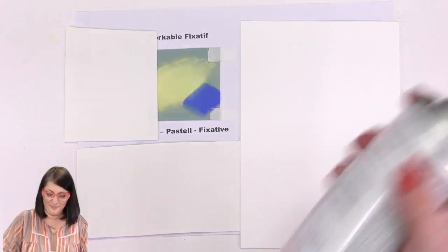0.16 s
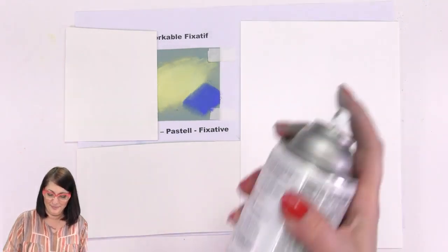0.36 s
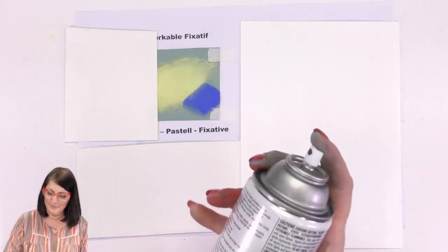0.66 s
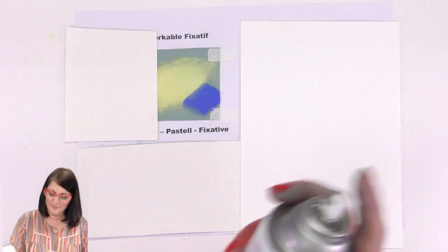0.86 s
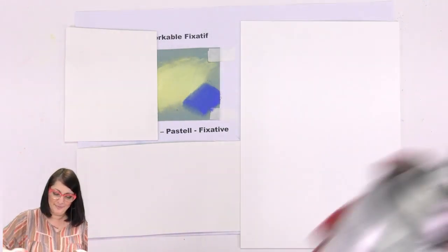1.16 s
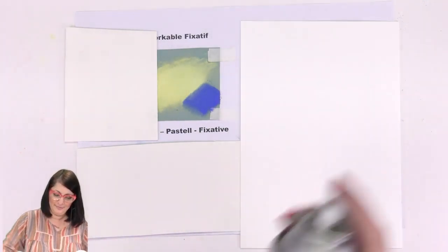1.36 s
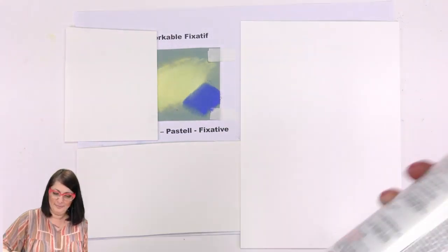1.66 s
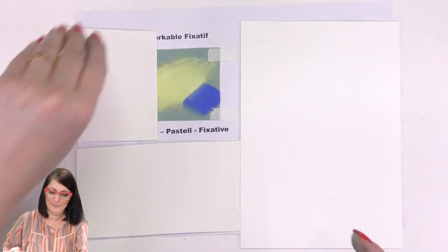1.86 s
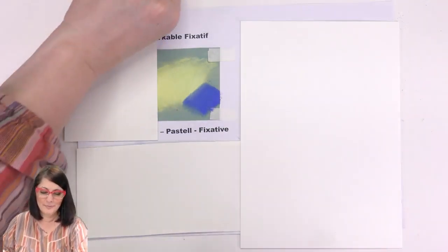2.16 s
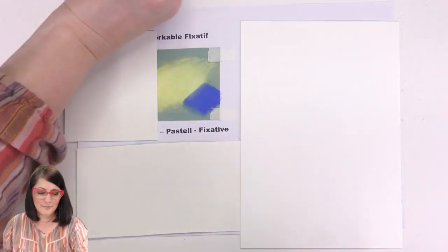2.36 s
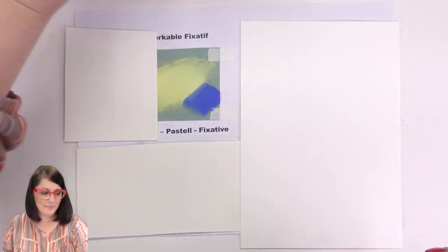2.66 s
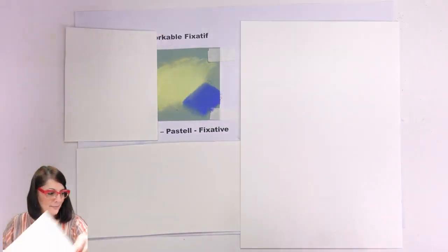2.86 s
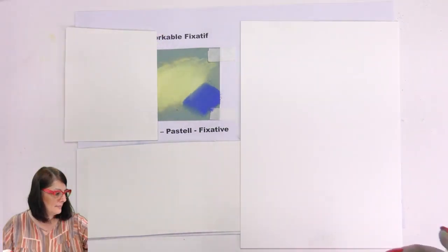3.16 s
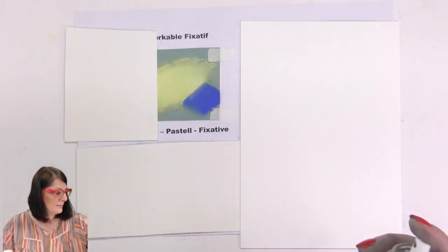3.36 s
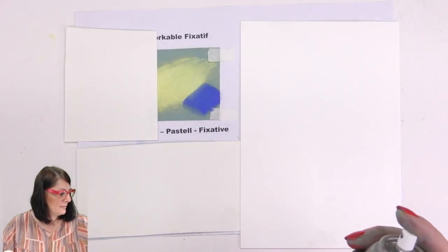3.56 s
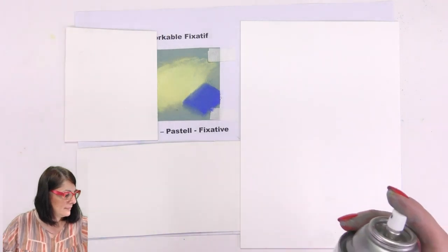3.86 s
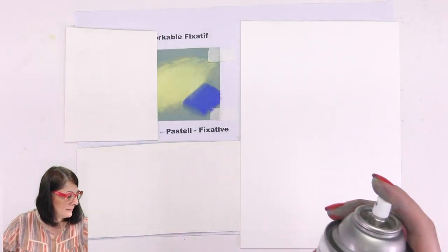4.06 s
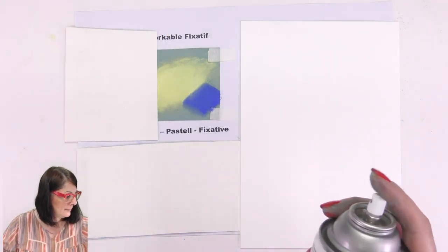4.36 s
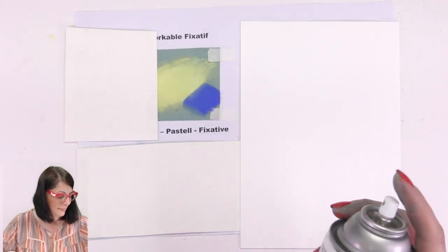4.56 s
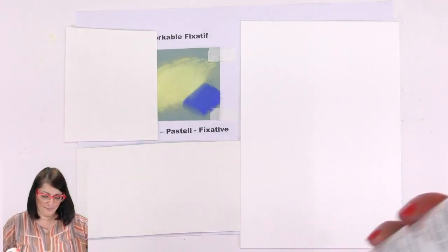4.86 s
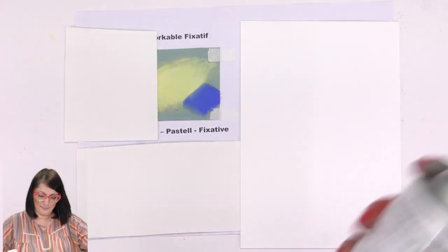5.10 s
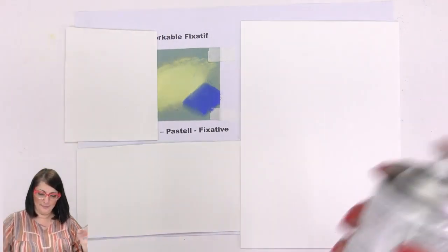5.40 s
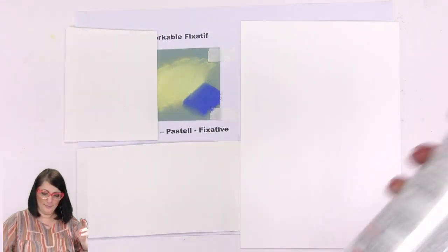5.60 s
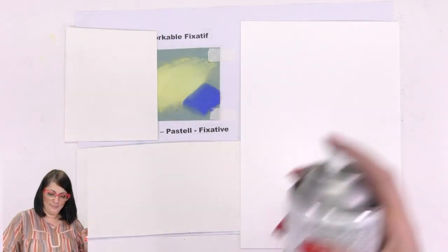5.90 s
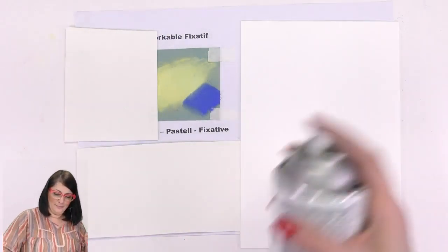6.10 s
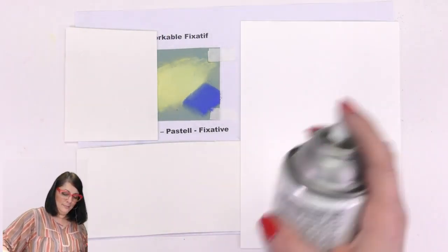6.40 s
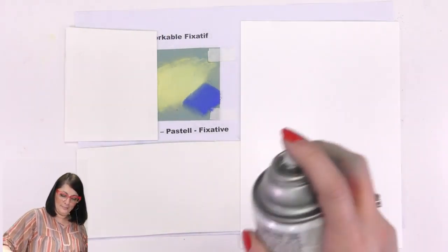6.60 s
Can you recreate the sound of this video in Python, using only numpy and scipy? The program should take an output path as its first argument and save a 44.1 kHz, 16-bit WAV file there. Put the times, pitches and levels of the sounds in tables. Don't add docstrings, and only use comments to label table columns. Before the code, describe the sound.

A half-full spray can is shaken hard in two bursts, its metal ball clacking and rattling, with ticking and soft rustles between.

```python
import sys
import numpy as np
from scipy import signal
from scipy.io import wavfile
from scipy.ndimage import uniform_filter1d

SR = 44100
rng = np.random.default_rng(int(sys.argv[2]) if len(sys.argv) > 2 else 0)


def boost(x):
    u = np.asarray(x, float) / 20
    return 10 ** u


def transcribe(u):
    v = np.clip(np.atleast_2d(u).T, -1, 1)
    q = np.round(v * 32767).astype(np.int16)
    wavfile.write(sys.argv[1], SR, q)


N = 297234

# pitch_hz, level_db (per Hz)
ROOM_TONE = [(20, -11), (45, -9.5), (150, -13), (270, -5), (432, -19), (1200, -29), (8000, -51),
             (16500, -55.5)]
# pitch_hz, level_db
DRONE_TONES = [(49, -68), (92, -72.5), (198, -75.5), (261, -71.5)]
# peak_s, rise_s, fall_s, level_db
ARM_SWINGS = [
    (.15, 0.21, 0.17, -51.5),
    (.93, 0.12, 0.24, -52.5),
    (1.17, 0.16, 0.055, -43.5),
    (1.42, 0.24, 0.45, -51.5),
    (4.9, 0.23, 0.98, -62),
    (5.55, 0.26, 0.47, -52.5),
    (6.1, 0.65, 0.96, -67),
]
# pitch_hz, level_db (per Hz)
LIQUID_COLOUR = [(590, -38), (1000, -8), (1540, -0.5), (2150, -0.5), (3460, -1), (7880, -7), (16000, -13.5)]
# time_s, level_db
LIQUID_EFFORT = [(0, -34.5), (.095, -44.5), (.21, -75.5), (.45, -54), (.68, -73.5), (.95, -69),
                 (1.25, -45.5), (1.5, -40), (1.7, -69.5), (1.9, -63.5), (2.04, -71), (2.9, -76.5),
                 (4.9, -82), (5.08, -62), (5.3, -48), (6.2, -54), (6.6, -85), (6.74, -66)]
# peak_s, rise_s, fall_s, rustle_db, rub_db
HAND_BRUSHES = [(.77, 0.049, 0.025, -67.5, -93), (2.17, 0.18, 0.17, -59.5, -78),
                (2.43, 0.19, 0.46, -52, -63), (2.68, 0.081, 0.022, -64.5, -79),
                (2.78, 0.098, 0.049, -74.5, -69.5), (3.1, 0.13, 0.033, -71, -80.5),
                (3.13, .008, 0.055, -84.5, -61), (3.8, 0.062, 0.082, -66, -61),
                (4.207, 0.011, 0.069, -58.5, -64), (4.3, 0.075, 0.077, -63.5, -59.5),
                (4.48, .11, 0.17, -58.5, -66), (4.632, .006, 0.074, -66.5, -51.5),
                (4.82, 0.035, 0.1, -66, -81.5)]
# peak_s, rise_s, fall_s, level_db
DOME_ROLLS = [
    (.55, 0.065, 0.28, -65.5),
    (2.4, .07, 0.22, -56.5),
    (2.72, 0.15, 0.08, -65),
    (3.02, .08, 0.08, -66),
]
# peak_s, rise_s, fall_s, level_db, pitch_hz
WALL_TRUNDLES = [
    (.3, 0.052, 0.2, -48.5, 1790),
    (.93, 0.07, 0.065, -58, 1600),
    (1.95, 0.14, 0.093, -50, 1526),
    (2.23, 0.12, .07, -57.5, 1500),
    (2.43, 0.1, 0.15, -53, 1496),
    (4.95, 0.031, 0.084, -54.5, 1576),
]
# pitch_factor, level_db, t60_s
DOME_MODES = [(1.0023, 3.5, 0.0066), (0.872, -9, 0.015), (0.66, -11, 0.0083), (1.14, -7.5, 0.009)]
# pitch_factor, level_db, t60_s
WALL_MODES = [(1.0, -4, 0.012), (.8, -7, 0.011), (0.69, -7, 0.0074), (1.5, -5.5, 0.011), (1, -19.5, .06)]
# pitch_factor, level_db, t60_s
BODY_MODES = [(1.4, -0.5, 0.027), (0.57, -9.5, 0.02), (1.45, -14, 0.015)]
# start_s, dome_db, wall_db, crack_db, dome_hz
BLOWS = [(0.9914, -9, -31.5, -20, 3900), (1.0179, -12, -21.5, -15.5, 3915),
         (1.075, -5.5, -20, -12, 4000), (1.1539, -4, -28, -10, 3000), (1.164, -0.5, -21, -20, 3896),
         (1.1733, -10, -25.5, -13.5, 3895), (1.2186, -15, -27, -22, 3353),
         (1.3023, -4.5, -16, -13, 3512), (1.3958, -1.5, -27, -10.5, 3418),
         (1.8257, -8.5, -25, -24.5, 3930), (2.3294, -16.5, -29, -29, 3600),
         (4.9928, -10, -17, -12.5, 4030), (5.1051, -4, -36, -11, 3320), (5.2042, -4, -14.5, -10, 3894),
              (5.3067, -1.5, -48, -13, 3487), (5.4349, -6.5, -12, -13.5, 3590),
              (5.5129, -24.5, -24, -26.5, 4840), (5.5505, -4.5, -9, -12, 3515),
              (5.5566, -1.5, -18, -17, 3617), (5.576, -27, -33, -12.5, 2900),
              (5.6571, -3.5, -16, -11.5, 3810), (5.7424, -3, -48, -9, 3310),
              (5.873, -4.5, -15, -13.5, 3850), (5.9738, -1.5, -19.5, -12, 3886),
              (6.091, -5, -30, -8.5, 3860), (6.1824, -1, -36, -10.5, 3765), (6.253, -23, -17.5, -35, 2500),
              (6.3085, -8, -23, -13, 3760), (6.4216, -15, -17, -18, 2680),
              (6.5085, -20, -20.5, -29.5, 4220), (6.6987, -16.5, -24, -15.5, 3680)]
# start_s, clack_db, clack_hz, crack_hz, wall_hz
BLOW_LANDINGS = [(0.9914, -9.5, 5500, 7250, 2150), (1.0179, -14, 4790, 12130, 2560),
                 (1.075, -19, 4440, 7010, 2500), (1.1539, -10, 4950, 7010, 2570),
                 (1.164, -9.5, 4950, 11330, 2640), (1.1733, -21.5, 4778, 13040, 2590),
                 (1.2186, -32, 6560, 8300, 2370), (1.3023, -16.5, 4400, 9920, 1390),
                 (1.3958, -5.5, 5150, 7010, 1710), (1.8257, -27.5, 5570, 7860, 2030),
                 (2.3294, -27.5, 4680, 9370, 2550), (4.9928, -21, 4620, 9700, 1580),
                 (5.1051, -10, 4550, 8780, 2560), (5.2042, -21, 5330, 8060, 2420),
                 (5.3067, -5, 4780, 12120, 2580), (5.4349, -17.5, 4610, 9560, 1760),
                 (5.5129, -31, 5100, 13000, 1250), (5.5505, -13, 6470, 9430, 2600),
                 (5.5566, -21, 4300, 11410, 2540), (5.576, -21.5, 4600, 6930, 2280),
                 (5.6571, -11.5, 5640, 9370, 2380), (5.7424, -7, 4570, 9270, 2210),
                 (5.873, -16, 5670, 7840, 2040), (5.9738, -7, 4705, 12960, 2070),
                 (6.091, -13.5, 4780, 9160, 1920), (6.1824, -9.5, 4810, 8330, 2340),
                 (6.253, -31.5, 4710, 7960, 2170), (6.3085, -20.5, 5840, 9280, 1790),
                 (6.4216, -26, 4520, 11000, 1820), (6.5085, -28.5, 4420, 7900, 1514),
                 (6.6987, -23.5, 5440, 7700, 2430)]
# start_s, dome_db, wall_db,
# wall_hz
TAPS = [(.0975, -36, -32, 1130), (0.2344, -35, -21.5, 1850), (0.2822, -33.5, -25.5, 1870),
        (.311, -47, -30.5, 1610), (0.3738, -31.5, -33, 1810), (0.8685, -48, -52.5, 1500),
        (0.9217, -35.5, -30.5, 1760), (.9735, -34.5, -34, 1400), (1.028, -20.5, -19.5, 2260),
        (1.1164, -33, -19, 1470), (1.1926, -27.5, -41.5, 2090), (1.2401, -22, -15.5, 1845),
        (1.2635, -39, -35.5, 1710), (1.289, -32, -24.5, 1580), (1.3482, -29, -18.5, 1620),
        (1.374, -45.5, -31.5, 1260), (1.417, -19, -22, 1390), (1.4472, -15, -16, 1780),
        (1.4648, -26, -16, 1840), (1.478, -39, -19.5, 1720), (1.5637, -37.5, -38, 1610),
        (1.5719, -42, -30.5, 1400), (1.7083, -50, -46, 1067), (1.7304, -26.5, -20, 1784),
        (1.859, -25, -28.5, 1560), (1.9071, -39, -28, 1560), (2.2501, -59.5, -50, 1490),
        (2.7731, -48.5, -47.5, 2300), (2.7886, -45, -49, 1410), (3.1243, -70.5, -45.5, 1170),
        (4.9168, -29.5, -31, 1580), (5.1571, -20, -19.5, 1770), (5.183, -25, -26, 2050),
             (5.258, -27, -20, 1750), (5.302, -31, -33, 1330), (5.362, -18, -22, 2230),
             (5.39, -33, -19, 1840), (5.4235, -21, -23, 1610), (5.5887, -15, -15, 1640),
             (5.6103, -20, -19, 1400), (5.8023, -20.5, -22.5, 1780), (5.8423, -21.5, -20.5, 1890),
             (5.918, -39, -19.5, 1750), (5.9701, -20, -20.5, 1186), (6.0305, -21, -16.5, 1810),
             (6.1476, -21, -20, 1810), (6.197, -15, -25, 2260), (6.208, -17, -16, 1930),
             (6.2769, -32, -19, 1790), (6.2983, -25, -23.5, 2220), (6.458, -50, -35, 1750),
             (6.6376, -28.5, -21, 2033), (6.7237, -28, -28, 1670)]
# start_s, clack_db, clack_hz, crack_hz, dome_hz
TAP_LANDINGS = [(0.0975, -47, 6560, 8240, 2800), (0.2349, -36, 5060, 6800, 4390),
                (0.2823, -44, 4580, 7040, 3590), (0.311, -46, 4670, 8800, 3390),
                (0.3743, -36.5, 4520, 10300, 3500), (0.8692, -68, 4510, 9540, 3820),
                (0.9221, -48, 4450, 10700, 3950), (0.9735, -52, 4400, 9600, 3320),
                (1.0283, -30, 4460, 7010, 2700), (1.1161, -36, 4510, 8820, 3880),
                (1.1935, -30.5, 5580, 11350, 3260), (1.2403, -27.5, 5160, 11300, 2760),
                (1.2635, -40.5, 6630, 8820, 2900), (1.2893, -44.5, 5530, 7600, 3600),
                (1.3483, -40, 6640, 9000, 2700), (1.3743, -37.5, 4400, 10870, 3880),
                (1.4174, -23, 4740, 7890, 2970), (1.4474, -33.5, 6920, 7010, 3000),
                (1.4648, -24, 4440, 9400, 2770), (1.478, -46, 5460, 7500, 3550),
                (1.5631, -50, 4790, 7280, 2820), (1.5724, -42, 5540, 11090, 3190),
                (1.7083, -65, 5010, 7410, 3630), (1.7305, -35, 5440, 7330, 4080),
                (1.859, -33, 4400, 8550, 3930), (1.9071, -40, 4400, 8770, 4390),
                (2.2501, -60, 5030, 7360, 3940), (2.7731, -58, 4860, 7910, 3770),
                (2.7886, -62, 4570, 12530, 3710), (3.1243, -75, 4570, 10550, 3930),
                (4.9168, -44, 4400, 8200, 3710), (5.1575, -28, 5390, 7040, 3490),
                     (5.1835, -30, 5060, 7060, 3200), (5.258, -31, 4700, 7870, 2700),
                     (5.302, -21.5, 4500, 8150, 3170), (5.3618, -22.5, 4300, 9960, 3000),
                     (5.3898, -35, 6100, 7010, 2700), (5.4235, -33, 4480, 8420, 4360),
                     (5.5884, -34, 5520, 9040, 2800), (5.6103, -40, 4530, 7080, 3730),
                     (5.8021, -36, 4870, 7010, 3770), (5.8425, -29, 4610, 9430, 2700),
                     (5.918, -35, 4360, 8270, 3880), (5.9701, -17.5, 5200, 12730, 3700),
                     (6.0306, -22, 4940, 7010, 4000), (6.1478, -32, 5140, 9330, 2700),
                     (6.197, -38, 4380, 7190, 3770), (6.208, -28, 4400, 7530, 3960),
                     (6.2771, -30, 4960, 7240, 3010), (6.2985, -40, 4500, 7640, 3830),
                     (6.458, -52, 4530, 7390, 3410), (6.6378, -31.5, 6160, 7600, 4390),
                     (6.7237, -47, 6370, 7420, 3840)]
# first_s, last_s, gap_s, dome_db, wall_db
CHATTER_RUNS = [
    (.3344, .3579, .023, -43, -32),
    (.4173, 0.468, 0.016, -28.5, -37),
    (0.54, .6283, 0.027, -59, -48.5),
    (1.938, 1.976, .02, -40.5, -34),
    (2.378, 2.436, 0.021, -40, -33.5),
    (2.461, 2.5374, 0.0276, -28.5, -44),
    (4.941, 4.977, 0.013, -32.5, -36.5),
]
# start_s, level_db, pitch_hz
DOME_TICKS = [(2.3935, -26.5, 3670), (2.4169, -34, 3680), (2.4443, -33.5, 3410), (2.6948, -49, 3680),
              (2.7207, -54, 3660), (2.9764, -56.5, 4070), (2.9964, -61, 3980), (3.0174, -55, 3840),
              (3.042, -50, 3840), (3.0724, -60.5, 4100), (3.3313, -49, 4030), (3.3754, -59.5, 4290),
              (3.5744, -64, 4280), (3.6134, -57.5, 4170), (3.6314, -64, 4300), (3.6574, -67, 4220)]
# start_s, body_db, body_hz, thump_db, tail_db
GRIP_KNOCKS = [(0.0975, -41, 1120, -64, 6.5), (0.2349, -51, 1120, -58, -3.5),
               (0.9914, -41, 1120, -50, -1.5), (1.0179, -40, 1050, -47, -2.5), (1.075, -29.5, 447, -47, 1),
               (1.1539, -29, 1090, -37, -2), (1.164, -30, 397, -36, -1), (1.1733, -31, 990, -40, -3),
               (1.2186, -44.5, 955, -59, -1), (1.3023, -26, 444, -36, 1.5), (1.3958, -31.5, 464, -38, -0.5),
               (1.7305, -48.5, 1040, -55, 1.5), (1.8257, -37.5, 450, -55, -3.5),
               (2.3294, -48, 700, -59, -2), (4.9928, -35, 950, -62.5, -1), (5.1051, -39, 1070, -48, 0),
               (5.2042, -28, 660, -62, 0), (5.3067, -30, 1110, -45, -2), (5.4349, -33, 1070, -55, 0.5),
               (5.5129, -36.5, 900, -58, 0), (5.5505, -33, 1000, -38, 1), (5.5566, -46, 930, -39, -1.5),
               (5.576, -37, 1080, -48, -1.5), (5.6571, -29.5, 440, -56, 0.5),
               (5.7424, -29.5, 449, -40, 0.5), (5.873, -29, 430, -36, 3.5), (5.9738, -26, 425, -27, -3.5),
               (6.091, -27, 1080, -52, -0.5), (6.1824, -30, 410, -38, 0.5), (6.253, -25.5, 1100, -48, 3.5),
               (6.3085, -32, 700, -58, 1), (6.4216, -34, 1050, -50, -4.5), (6.5085, -54, 1000, -57, -3.5),
               (6.6378, -41.5, 820, -59, -3), (6.6987, -53, 1060, -67, -2)]
# delay_s, level_db
NEAR_ECHOES = [
    (.0022, -22),
    (.0095, -19),
]
# pitch_hz, level_db, t60_s
ROOM_TAIL = [(307, -12.5, 0.13), (980, 4.5, 0.2), (2910, 3.5, 0.29), (5340, 0, 0.27), (9450, -1, .23),
             (15200, -7.5, 0.28)]

GENTLE_DULL = 0.65
FIRM_DB = -39.5


def evened(x):
    return x / np.sqrt(np.mean(x ** 2) + 1e-20)


def read(points, hz, column=1):
    table = np.transpose(points)
    return np.interp(np.log(hz + 1), np.log(table[0] + 1), table[column])


def motion(table):
    time_s, level_db = np.transpose(table)
    return np.interp(np.arange(N) / SR, time_s, level_db)


def humps(table, column=3):
    t = np.linspace(0, N / SR, num=3000)
    table = np.transpose(table)[:, :, None]
    peak_s, rise_s, fall_s = table[:3]
    away = np.maximum((peak_s - t) / rise_s, (t - peak_s) / fall_s)
    level_db = table[column] - 20 * np.minimum(away, 4) ** 1.3
    return np.interp(np.arange(N) / SR, t, boost(level_db).sum(0))


def add(mix, s, sound):
    part = mix[round(s * SR):][:len(sound)]
    part += sound[:len(part)]


def filtered(x, order, hz, kind="low"):
    return signal.sosfilt(signal.butter(order, hz, kind, fs=SR, output="sos"), x)


def coloured_noise(colour, size, patchy_db):
    hz = np.fft.rfftfreq(size, 1 / SR)[:, None]
    frames = N * 4 // size + 5
    a, b, patches = rng.standard_normal((frames, len(hz), 3)).T
    patches = uniform_filter1d(uniform_filter1d(patches, 6, 0), 8, 1)
    z = (a + 1j * b) * boost(read(colour, hz) + patchy_db * evened(patches))
    return signal.istft(z, nperseg=size, noverlap=size * 3 // 4)[1][:N]


def bumps(spread_db, per_s):
    size = boost(spread_db * rng.exponential(1, N))
    return size * rng.choice([-1, 1], N) * (rng.random(N) < per_s / SR)


def air():
    hush = boost(-64.5) * evened(coloured_noise(ROOM_TONE, size=4096, patchy_db=1.2))
    lumps = evened(filtered(rng.standard_normal(N), 2, [10, 30], "band"))
    still_air_db = -72.5
    return hush + (boost(still_air_db) + humps(ARM_SWINGS)) * lumps


def drone():
    out, t = np.zeros(N), np.arange(N) / SR
    for (hz, db), wander in zip(DRONE_TONES, rng.standard_normal((len(DRONE_TONES), 2, 60))):
        level_sway, pitch_sway = [np.interp(t, np.linspace(0, t[-1], len(w)), w) for w in wander]
        phase = 2 * np.pi * np.cumsum(hz + 2.5 * pitch_sway) / SR
        out += boost(db + 2.1 * level_sway) * np.sin(phase)
    return out


def slosh():
    wash = evened(coloured_noise(LIQUID_COLOUR, size=256, patchy_db=3.0))
    rub = evened(filtered(rng.standard_normal(N), 2, [420, 1600], "band"))
    drops = boost(2.0 * rng.exponential(1, N)) * (rng.random(N) < 900 / SR)
    flicker = evened(1.2 + 0.2 * evened(signal.lfilter([1], [1, -.985], drops)))
    effort_db = motion(LIQUID_EFFORT)
    grip_db = -24.5 + 0.73 * effort_db
    wet = (boost(effort_db) + humps(HAND_BRUSHES)) * wash
    dull = (boost(grip_db) + humps(HAND_BRUSHES, column=4)) * rub
    return flicker * (wet + dull)


def ring(modes, chance, pitch_hz, damp=1.0, blow_db=0.0):
    t = np.arange(1536) / SR
    hz, db, t60 = np.transpose(modes)[:, :, None]
    side = np.arange(len(hz))[:, None] > 0
    hz_luck, db_luck, phase = chance[:len(hz)].T[:, :, None]
    hz = hz * pitch_hz * (1 + .04 * hz_luck * side)
    size = boost(db + (2.0 * db_luck + .14 * blow_db) * side)
    contact_s = 0.00015 * (2.0 - blow_db / 15)
    fade = boost(-60 * t * damp / t60) * (1 - np.exp(-t / contact_s))
    tones = size * fade * np.sin(2 * np.pi * hz * t + phase)
    return tones.sum(0) / np.linalg.norm(size)


def roll():
    dome = ring(DOME_MODES[:4], rng.standard_normal((6, 3)), 3850, damp=1.3, blow_db=-49.5)
    return humps(DOME_ROLLS) * evened(signal.oaconvolve(bumps(2.9, per_s=160), dome)[:N])


def trundle():
    wall_bumps = bumps(3.0, per_s=300)
    t, out = np.arange(4096) / SR, np.zeros(N)
    t60_s = 0.041
    for row in WALL_TRUNDLES:
        note = boost(-60 * t / t60_s) * np.sin(2 * np.pi * row[4] * t)
        out += humps([row]) * evened(signal.oaconvolve(wall_bumps, note)[:N])
    return out


def dulling_db(top_db):
    return GENTLE_DULL * min(top_db - FIRM_DB, 0)


def crack_db(dome_db, wall_db):
    top_db = max(dome_db, wall_db)
    return top_db - 11 + dulling_db(top_db)


def loose(s, dome_db, wall_db, dome_hz, wall_hz):
    clack_db = dome_db - 12.0 + dulling_db(max(dome_db, wall_db))
    clack_hz, crack_hz = 4920, 9300
    return (s, dome_db, wall_db, crack_db(dome_db, wall_db), dome_hz, wall_hz, clack_db, clack_hz, crack_hz)


def chatter():
    rows, wall_hz, dome_hz = [], 1580, 3520
    fade_db, uneven_db, hurry = -7.5, -0.5, 0.36
    chances = rng.standard_normal((len(CHATTER_RUNS), 8, 3))
    for (first, last, gap, dome_db, wall_db), lucks in zip(CHATTER_RUNS, chances):
        span = last - first
        for along, luck in zip(np.linspace(0, 1, round(span / gap) + 1), lucks):
            db = fade_db * along + uneven_db * luck[0]
            early = along * (1 - along) * (hurry * span + 0.17 * gap * luck[1])
            s = first + along * span + early
            rows.append(loose(s, dome_db + db, wall_db + db,
                              dome_hz * (1 + 0.043 * luck[2]), wall_hz * (1 + 0.02 * luck[1])))
    return rows


def strikes():
    rows = []
    for blow, spot in zip(BLOWS, BLOW_LANDINGS):
        rows.append((*blow, spot[4], *spot[1:4]))
    for s, db, hz in DOME_TICKS:
        rows.append(loose(s, db + 1, db - 18, hz, 1580))
    taps, landings = TAPS, TAP_LANDINGS
    for (s, dome_db, wall_db, wall_hz), spot in zip(taps, landings):
        rows.append((s, dome_db, wall_db, crack_db(dome_db, wall_db), spot[4], wall_hz, *spot[1:4]))
    return rows + chatter()


def knock(row):
    near = min(GRIP_KNOCKS, key=lambda k: abs(k[0] - row[0]))
    if abs(near[0] - row[0]) < .003:
        return near
    body_db = 1.2 * max(row[1], row[2]) - 28.5
    return row[0], body_db, 700, -90, 0


def strike(row, grip, chance, grit, damp):
    s, dome_db, wall_db, tick_db, dome_hz, wall_hz, clack_db, clack_hz, crack_hz = row
    crack_grit, clack_grit = grit
    blow_db, t = min(max(dome_db, wall_db), 0), np.arange(grit.shape[1]) / SR
    sound = boost(dome_db + 7.0) * ring(DOME_MODES, chance[0], dome_hz, damp, blow_db)
    sound += boost(wall_db + 5.0) * ring(WALL_MODES, chance[1], wall_hz, damp, blow_db)
    crack = evened(crack_grit + 0.8 * np.sin(2 * np.pi * crack_hz * t))
    sound += boost(tick_db + 1.0 - 60 * t * damp / 0.0072) * crack * np.sqrt(damp)
    sound *= boost(0.29 * max(blow_db + 9.5, 0))
    clack = evened((0.9 + clack_grit) * np.sin(2 * np.pi * clack_hz * t))
    sound += boost(clack_db + 4 - 60 * t * damp / 0.0097) * clack * np.sqrt(damp)
    return sound + boost(grip[1] + 4.5) * ring(BODY_MODES, chance[2], grip[2], damp)


def ball():
    direct, blunt, thumps = np.zeros((3, N))
    rows, t = strikes(), np.arange(1536) / SR
    chances = rng.standard_normal((len(rows), 3, 6, 3))
    cracks = evened(filtered(rng.standard_normal((len(rows), 1536)), 2, [5300, 14000], "band"))
    clacks = evened(filtered(rng.standard_normal((len(rows), 1536)), 2, 1500))
    for row, chance, grit in zip(rows, chances, np.stack([cracks, clacks], axis=1)):
        grip = knock(row)
        thump_hz, thump_t60_s = 150, .025
        thump = boost(grip[3] + 1 - 60 * t / thump_t60_s) * np.sin(2 * np.pi * thump_hz * t)
        add(thumps, row[0], thump)
        add(direct, row[0], strike(row, grip, chance, grit, damp=0.94))
        add(blunt, row[0], boost(grip[4]) * strike(row, grip, chance, grit, damp=4.2))
    return filtered(direct, 3, 300, "high") + thumps, filtered(blunt, 3, 300, "high")


def room(direct, blunt):
    near = direct.copy()
    for s, db in NEAR_ECHOES:
        add(near, s, boost(db) * direct)
    hz, t, z = signal.stft(rng.standard_normal((3, SR // 2)), SR, nperseg=128)
    shape = boost(read(ROOM_TAIL, hz)[:, None] - 60 * t / read(ROOM_TAIL, hz, column=2)[:, None])
    tails = signal.istft(z * shape, SR, nperseg=128)[1]
    tails *= 1 + 3.0 * np.exp(-np.arange(tails.shape[1]) / SR / 0.0027)
    tails /= np.linalg.norm(tails[0])
    turns_per_s = 3.1
    turn = 2 * np.pi * (turns_per_s * np.arange(N) / SR + np.arange(3)[:, None] / 3)
    fed = np.sqrt(2 / 3) * np.cos(turn) * blunt
    wet_db = -1.0
    return near + boost(wet_db) * signal.fftconvolve(fed, tails, axes=1).sum(0)[:N]


def scene():
    background = air() + drone()
    can = slosh() + roll() + trundle() + room(*ball())
    return np.ones((2, 1)) * (background + can)


def band_limit(x):
    return signal.sosfilt(signal.butter(12, 16970, fs=SR, output="sos"), x)


def record(dry):
    fed = dry * boost(np.array([[-4.5], [3.0]]))
    ceiling = np.array([[.52], [.7]])
    flat = fed / (1 + abs(fed / ceiling) ** 6.0) ** (1 / 6.0)
    low_pass = signal.firwin(127, 16300, fs=SR)
    mix = signal.oaconvolve(flat, low_pass[None], "same")
    return band_limit(mix)


dry = scene()
out = record(dry)
transcribe(out)
```